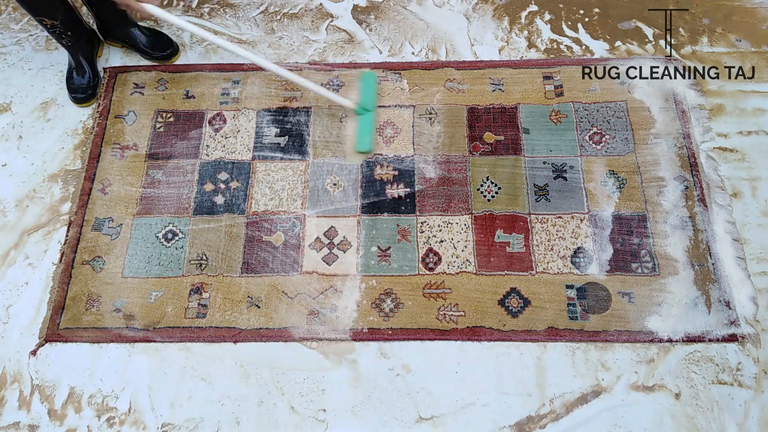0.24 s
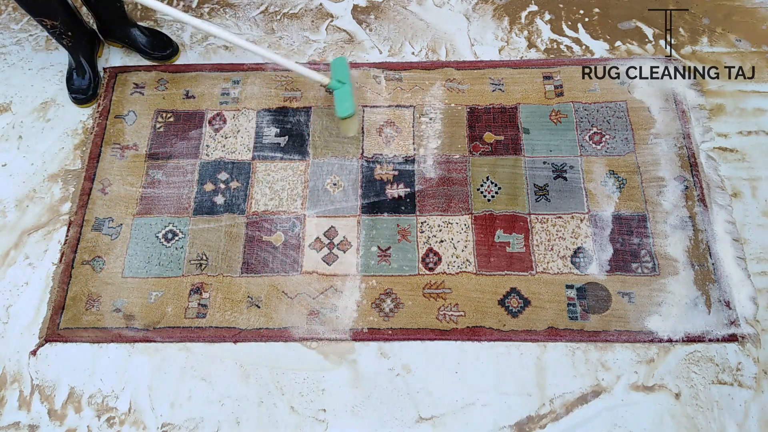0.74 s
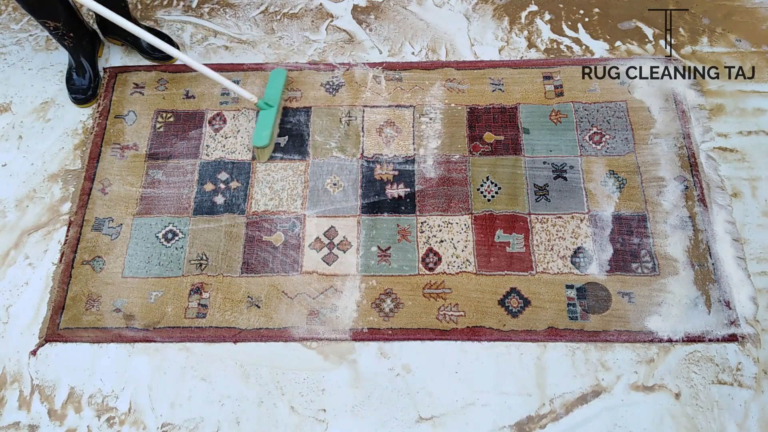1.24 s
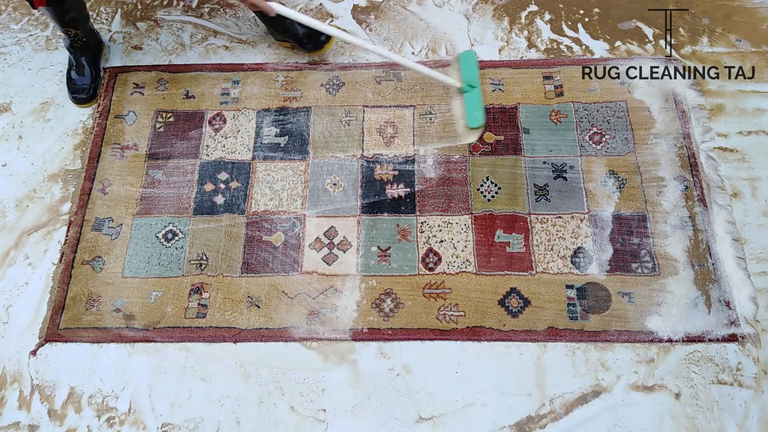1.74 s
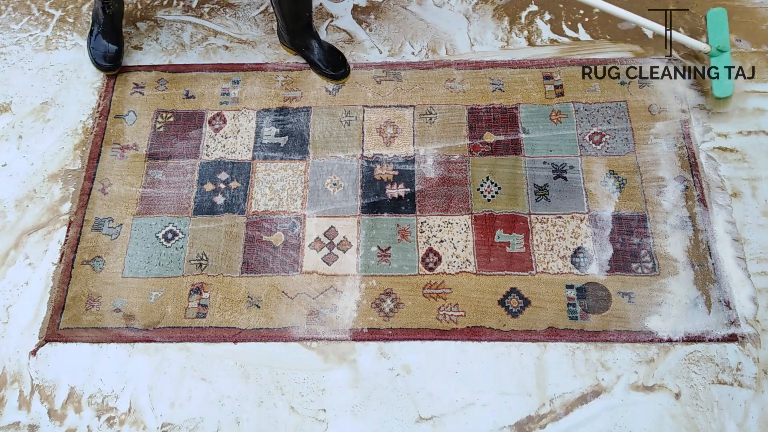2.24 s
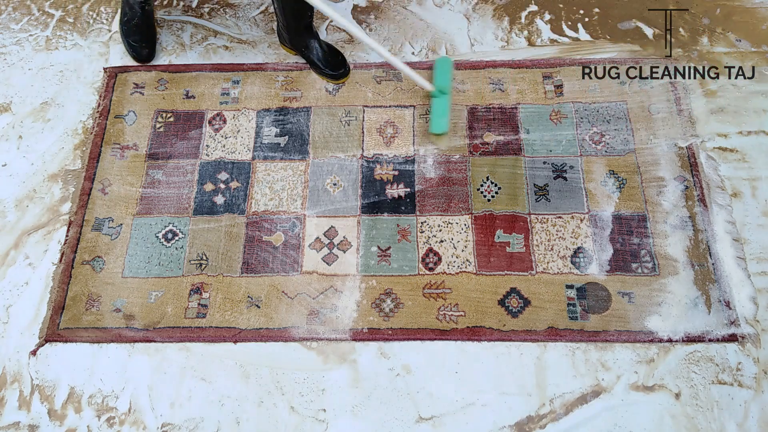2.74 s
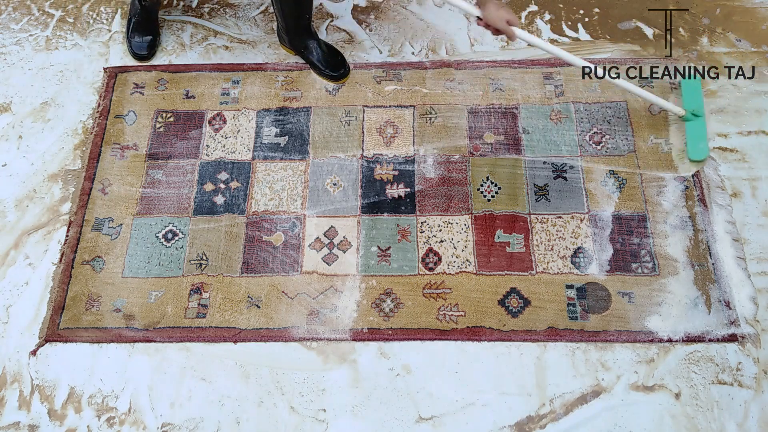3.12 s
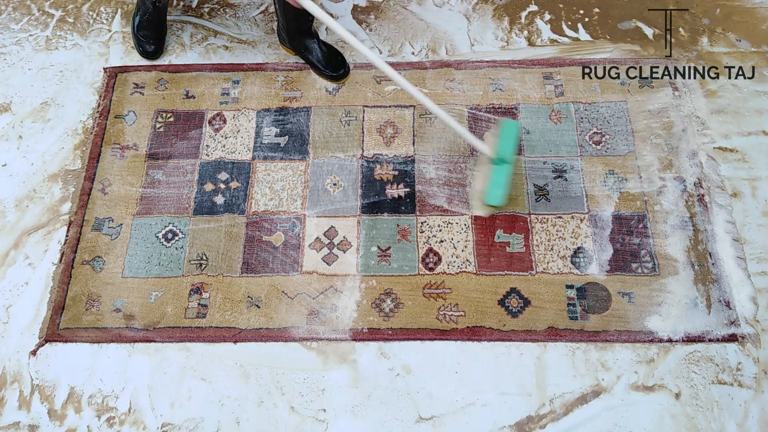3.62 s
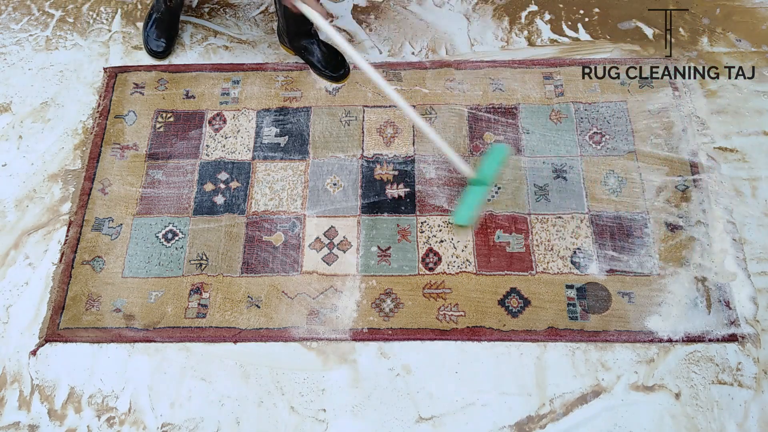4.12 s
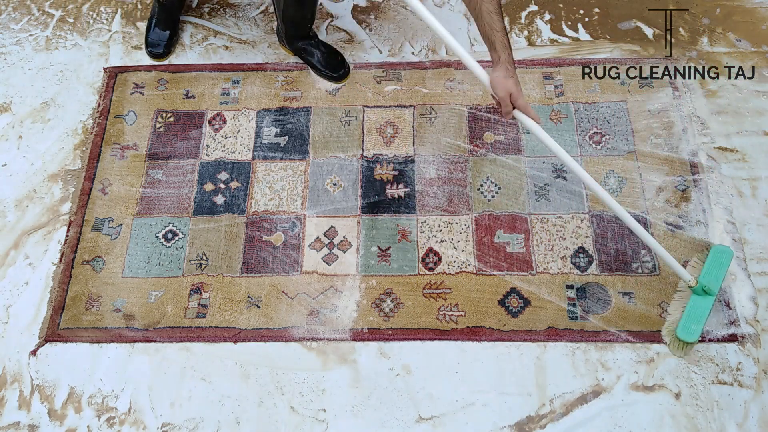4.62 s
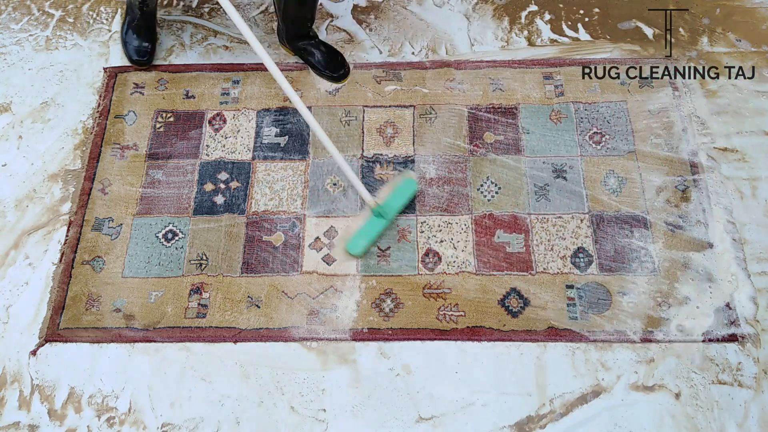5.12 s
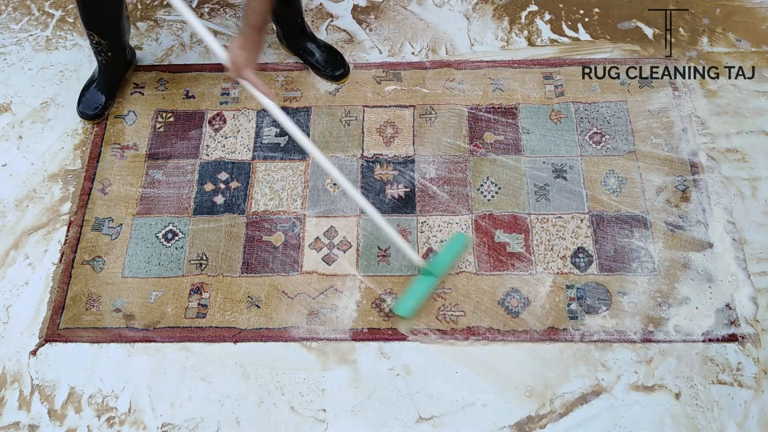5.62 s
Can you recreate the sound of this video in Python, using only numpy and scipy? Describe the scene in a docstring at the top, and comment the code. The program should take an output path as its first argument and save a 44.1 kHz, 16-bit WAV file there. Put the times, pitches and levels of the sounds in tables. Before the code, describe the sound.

Stiff bristles rasp back and forth over a foamy wet rug, the brush head smacking down once early on.

```python
"""A stiff push brush scrubs a wet, soapy rug on a hard floor in a washing room. It opens on quick
strokes over dull bumps: bristle tips flick across the pile, rasping lower the harder they bend, while
foam fizzes and wet tufts groan. A faint tone starts to come and go. Near 0.9 s the head is slapped
down; a light touch leads into one long, softer stroke. Set down again, the brush scrubs briskly back
and forth from 2.5 s to the end."""
import sys
import numpy as np
from scipy import signal
from scipy.fft import rfft, irfft
from scipy.io import wavfile

SR = 44100
rng = np.random.default_rng(int(sys.argv[2]) if len(sys.argv) > 2 else 0)


def unload_audio(sound):
    """Save the sound as a 16-bit wav file, at the path given as the first command line argument."""
    columns = np.transpose(np.atleast_2d(sound))
    # keep every value between -1 and 1, then stretch to whole-number steps
    steps = np.round(np.clip(columns, -1, 1) * 32767)
    wavfile.write(sys.argv[1], SR, steps.astype(np.int16))


N = 258426
TIME = np.arange(N) / SR
FREQS = np.maximum(np.arange(N + 1) * SR / (2 * N), 1)


def from_db(db):
    """Decibels to gain."""
    return 10 ** (np.asarray(db) / 20)


def to_db(power):
    """Power to decibels."""
    return 10 * np.log10(power + 1e-14)


def rms_one(x):
    """Scale to unit power."""
    return x / np.sqrt(np.mean(x ** 2) + 1e-20)


def at_hz(points, hz):
    """Read a curve on a log-frequency axis."""
    points = np.array(points)
    return np.interp(np.log(hz), np.log(points[:, 0]), points[:, 1])


def shaped(x, gain):
    """Equalise with a gain given at FREQS."""
    return irfft(rfft(x, 2 * N) * gain)[:N]


def coloured(x, spectrum):
    """Give x a tone colour, at unit power."""
    return rms_one(shaped(x, from_db(at_hz(spectrum, FREQS))))


def band(x, low_hz, high_hz, order=2):
    """Causal band-pass."""
    sos = signal.butter(order, [low_hz, min(high_hz, .45 * SR)], "band", fs=SR, output="sos")
    return signal.sosfilt(sos, x + 1e-18)


def drift(per_s):
    """A random wander at unit power, with about per_s turns a second."""
    knots = rng.standard_normal(4000)
    return rms_one(np.interp(TIME * per_s, np.arange(len(knots)), knots))


def flicks(per_s):
    """Random clicks of uneven size, at unit power."""
    return rms_one(rng.standard_normal(N) * (rng.random(N) < per_s / SR))


def ease(x):
    """Smooth fade from 0 to 1 as x goes from 0 to 1."""
    return np.sin(np.pi / 2 * np.clip(x, 0, 1)) ** 2


def burst(start, rise, t60):
    """Envelope of a hit: quick attack, exponential decay."""
    age = np.maximum(TIME - start, 0)
    return (1 - np.exp(-age / rise)) * from_db(-60 * age / t60)


def brush_motion():
    """Each stroke speeds up and slows, bending the bristles; the loudest contact sets the colour."""
    # Pushes and pulls. Each row: start in seconds, length in seconds, rasp level in dB, bite (share of
    # full speed reached almost at once), attack, release and bending time in seconds, low edge of the
    # bent rasp in Hz, then rubbing and foam in dB relative to the rasp.
    strokes = [ (-0.195, 0.29, -34, 0.1, 0.09, 0.18, 0.035, 430, -7.5, -1),
               (0.051, 0.38, -35.5, 0.31, 0.24, 0.21, 0.032, 360, -11, -6),
               (0.463, 0.22, -37, 0, 0.084, 0.16, 0.004, 340, -32, -3.5),
               (1.381, 0.78, -40.5, 0.01, 0.13, 0.13, 0.22, 344, -19, -4.5),
               (2.489, 0.35, -35, 0.06, 0.19, 0.12, 0.043, 382, -11, -6.5),
               (2.858, 0.33, -35, 0.07, 0.11, 0.2, 0.039, 466, -15.5, -5.5),
               (3.178, 0.36, -33, 0.02, 0.22, 0.14, 0.051, 423, -17, -5.5),
               (3.547, 0.37, -36, 0.22, 0.12, 0.2, 0.015, 607, -20, -4.5),
               (3.992, 0.28, -33, 0.55, 0.18, 0.13, 0.019, 312, -13, -4),
               (4.282, 0.37, -34, 0.2, 0.17, 0.2, 0.058, 455, -12.5, -5),
               (4.74, 0.32, -33.5, 0.42, 0.1, 0.15, 0.022, 406, -14.5, -3),
               (5.047, 0.388, -35, 0.06, 0.19, 0.19, 0.063, 525, -42, -2.5),
               (5.408, 0.15, -60, 0.2, 0.12, 0.041, 0.01, 1600, -28, 10),
               (5.518, 0.38, -35, 0.38, 0.1, 0.14, 0.036, 437, -14.5, -1.3)]
    # The head drags lightly as it turns round. Each row: start and end in seconds, rasp level in dB.
    on_rug = [(-0.1, 0.687, -56), (2.432, 4.687, -60), (4.641, 4.8, -65), (4.76, 5.486, -58.5)]
    settle_s, bite_s = 0.068, 0.023
    drag_hz, straight_hz = 1000, 3500  # low edge of the rasp: light drag, unbent bristles
    firm_db, thinning = -35.5, 0.61  # strokes below firm lose body, in dB for each dB
    drag = sum(from_db(db) ** 2 * ease((TIME - down) / settle_s) * ease((up - TIME) / settle_s)
               for down, up, db in on_rug)
    rasp = drag + 1e-14
    fizz = drag * from_db(-3) ** 2
    rub, log_edge, body = 0, rasp * np.log(drag_hz), 0
    for start, length, db, bite, attack, release, bend_s, bent_hz, rub_db, fizz_db in strokes:
        age = np.maximum(TIME - start, 1 / SR)
        rising = bite * ease((TIME - start) / bite_s) + (1 - bite) * ease((TIME - start) / attack)
        speed = rising * ease((length - age) / release) ** 0.6  # stops short
        edge_hz = np.minimum(bent_hz * (1 + (bend_s / age) ** 1.84), straight_hz)
        lather_db = 2 * (np.minimum(age / length, 1) - .5)  # foam piles up over the stroke
        power = (from_db(db) * speed) ** 2
        rasp += power
        rub += power * from_db(rub_db) ** 2
        fizz += (from_db(db + fizz_db + lather_db) * speed ** 0.88) ** 2  # follows speed more loosely
        log_edge += power * np.log(edge_hz)
        body += power * thinning * min(db - firm_db, 0)
    return to_db(rasp), to_db(rub), to_db(fizz), np.exp(log_edge / rasp), body / rasp


def bristles(level_db, edge_hz, body_db):
    """Tips flick free of the pile, tuft by tuft; bent bristles let the lower bands speak."""
    # Colour of the rasp. Each row: frequency in Hz, level in dB.
    rasp_colour = [(200, -1), (450, -8.5), (700, -2), (950, -0.5), (1250, -1.5), (1900, 1.63), (2750, -3.5),
                   (3700, -2), (4700, -8), (5600, -6), (7000, -17.5), (14000, -37)]
    body_hz, patchy_db, judder_db = 1070, 1.5, 0.35
    sources = [coloured(flicks(per_s=8000), rasp_colour) for _ in range(2)]
    edges = np.geomspace(200, 15000, 25)
    out = 0
    for k, (low, high) in enumerate(zip(edges, edges[1:])):
        hz = np.sqrt(low * high)
        low_shelf_db = body_db / (1 + (hz / body_hz) ** 4)
        tufts = band(sources[k % 2], low, high, order=4) * from_db(patchy_db * drift(45) + low_shelf_db)
        out += tufts / np.sqrt(1 + (edge_hz / hz) ** 10.5)  # steep, moving low cut
    # the whole head judders a little as it drags
    return rms_one(out) * from_db(level_db + judder_db * drift(82))


def resonate(x, hz, t60):
    """A click sets a sine ringing; nothing passes far below its pitch."""
    decay, step = from_db(-60 / (t60 * SR)), 2 * np.pi * hz / SR
    ring = signal.lfilter([0, np.sin(step)], [1, -2 * decay * np.cos(step), decay * decay], x + 1e-18)
    return signal.sosfilt(signal.butter(4, .75 * hz, "high", fs=SR, output="sos"), ring)


def rubbing(level_db, edge_hz):
    """Wet tufts stick and slip, ringing briefly just above the low edge of the rasp."""
    centre_hz, width_octaves, slips_per_s, t60 = 1.49 * edge_hz, 0.45, 14, .11
    out, power = 0, 1
    for hz in np.geomspace(260, 1900, 30):
        share = np.exp(-(np.log2(hz / centre_hz) / width_octaves) ** 2)
        slips = np.sign(flicks(slips_per_s)) * share
        out += resonate(slips, hz, t60)
        power += share ** 2
    slip_power = slips_per_s * t60 / (4 * np.log(1000))  # each slip is one decaying sine
    return from_db(level_db) * out / np.sqrt(power * slip_power)


def foam(level_db):
    """Tiny bubbles burst under the bristles."""
    # Colour of the fizz. Each row: frequency in Hz, level in dB.
    fizz_colour = [(2500, -19), (4000, 2), (4800, 2.5), (5600, 3), (7000, -4.5), (9200, -6.5), (10300, -2),
                   (12000, -4), (14000, 0), (16000, -5.5)]
    return from_db(level_db) * coloured(flicks(per_s=18000), fizz_colour)


def room_air():
    """Still air lays a low, quiet bed under the scene."""
    # Colour of the air. Each row: frequency in Hz, level in dB.
    air_colour = [(25, -21.5), (50, -4), (90, 2), (150, 0), (330, -4.5), (600, -11), (1000, -12.5),
                  (2000, -21), (4000, -26), (8000, -30.5), (14000, -26)]
    return from_db(-71) * coloured(rng.standard_normal(N), air_colour)


def contacts(rows, width_ratio, rise):
    """Each contact is a short noise burst in a band around its own pitch."""
    out, age = np.zeros(N + SR), TIME[:SR // 2]
    for start, db, hz, t60, *_ in rows:
        at = round(start * SR)
        noise = rms_one(band(rng.standard_normal(len(age)), hz / width_ratio, hz * width_ratio))
        out[at:at + len(age)] += noise * (1 - np.exp(-age / rise)) * from_db(db - 60 * age / t60)
    return out[:N]


def thuds():
    """Dull, soft-edged bumps on the floor."""
    # Each row: start in seconds, level in dB, centre in Hz, 60 dB decay time in seconds.
    bumps = [(0.005, -45.5, 294, 0.32), (0.072, -44.5, 280, 0.29), (0.105, -55.5, 96, 0.39),
             (0.575, -59, 290, 0.37), (1.2, -62, 380, 0.18), (3.215, -49.5, 84.5, .45),
             (4.13, -49.5, 88, 0.48), (4.145, -51, 216, 0.24), (4.195, -59, 72, 0.19)]
    return contacts(bumps, width_ratio=1.25, rise=0.0051)


def groans():
    """Tufts catch together in short rubbery groans, each on a wavering, sinking pitch."""
    # Each row: peak time in seconds, level in dB, pitch in Hz, half-length in seconds.
    catches = [(0.264, -49, 474, 0.027), (1.95, -47.5, 459, 0.069), (2.57, -37.5, 485, 0.011),
               (2.602, -35, 656, 0.027), (2.688, -37, 890, 0.11), (2.973, -40, 818, 0.013),
               (3.032, -40, 545, 0.019), (3.305, -37, 679, 0.03), (4.37, -43.5, 714, 0.019),
               (4.782, -38, 744, 0.025), (4.96, -40, 458, 0.046)]
    waver, fall_per_s = 0.0492, 0.65  # as shares of the pitch
    wavering_time = np.cumsum(1 + waver * drift(220)) / SR
    out = np.zeros(N)
    for peak, db, hz, half_length in catches:
        near = np.abs(TIME - peak) < 2 * half_length
        offset = TIME[near] - peak
        phase = 2 * np.pi * hz * (wavering_time[near] - fall_per_s * offset ** 2 / 2)
        out[near] += from_db(db) * np.exp(-2 * (offset / half_length) ** 2) * np.sin(phase)
    return out


def head_ring(start, db_per_octave, rise):
    """Head and handle ring, a little differently at each blow; the tilt favours the upper modes."""
    # Each row: pitch in Hz, relative level in dB, 60 dB decay time in seconds.
    modes = [(177, -8.5, .25), (264, -10.5, 0.17), (338, -9.5, .19), (368, -9.5, 0.13), (431, -9, 0.13),
             (502, -4.5, 0.14), (554, -9, 0.18), (649, -4.5, 0.13), (923, -11, 0.12), (1019, -3, 0.08),
             (1302, -5, 0.093), (1770, -11.5, 0.076), (2070, -16.5, 0.099), (3140, -27, 0.15),
             (3540, -25, .2), (3900, -26.5, 0.22)]
    age = np.maximum(TIME - start, 0)[:round((start + .5) * SR)]
    out = np.zeros(N)
    for k, (hz, db, t60) in enumerate(modes):
        struck_db = db + db_per_octave * np.log2(hz / 1000) + rng.normal(0, 1.5)
        envelope = from_db(struck_db - 60 * age / t60) * (1 - np.exp(-age / rise))
        out[:len(age)] += (-1) ** k * envelope * np.sin(2 * np.pi * hz * age)
    return out


def taps():
    """Bristles rustle and cushion the head, which rings softly as it is set down."""
    # Each row: start in seconds, rustle level in dB, its centre in Hz, its 60 dB decay time in seconds,
    # gain of the head's ring in dB.
    touches = [(0.436, -43, 2490, .08, -50.5), (1.268, -56, 5660, 0.41, -50), (1.301, -65, 3500, 0.14, -54),
               (2.379, -46.5, 3900, 0.18, -53.5), (2.413, -43, 2100, 0.1, -52.5),
               (4.002, -48, 2500, .1, -52), (4.063, -28.5, 5960, 0.11, -39),
               (4.751, -34.5, 2130, 0.072, -53)]
    ring = sum(from_db(ring_db) * head_ring(start, db_per_octave=6, rise=0.011)
               for start, *_, ring_db in touches)
    return contacts(touches, width_ratio=1.58, rise=0.0028) + ring


def faint_tone():
    """A narrow, fluttering whistle swells now and then in the background."""
    # Each row: peak time in seconds, level in dB, half-length in seconds.
    swells = [(0.715, -65.5, 0.089), (1.253, -69, 0.036), (1.468, -55, 0.052), (2.25, -69, 0.1)]
    pitch_hz, flutter_hz = 1268, 45
    envelope = sum(from_db(db) * np.exp(-2 * ((TIME - peak) / half_length) ** 2)
                   for peak, db, half_length in swells)
    return envelope * rms_one(band(rng.standard_normal(N), pitch_hz - flutter_hz, pitch_hz + flutter_hz))


def slap():
    """Wet bristles land first and buckle; then the block smacks the floor, rattles and rings."""
    # Two moments in seconds: the bristles touch, the block lands.
    landing = (0.877, 0.9055)
    # Colour of the landing bristles. Each row: frequency in Hz, level in dB.
    splat_colour = [(120, -42.5), (200, -21.5), (380, -8.5), (1230, 1.5), (2300, -7.5), (4100, -2),
                    (6400, -8.5), (8100, -15.5), (10300, -13), (14000, -8.5)]
    # Colour of the block's smack. Each row: frequency in Hz, level in dB.
    smack_colour = [(40, -60.5), (85, -28.5), (165, -7), (260, -7.5), (420, -3), (700, -7), (950, -8.5),
                    (1250, -8), (2100, -10.5), (2650, -24), (3700, -13), (6000, -20.5), (8200, -30),
                    (13000, -25.5), (15000, -32)]
    touch, land = landing
    splat = coloured(flicks(per_s=28000), splat_colour) * burst(touch, rise=0.006, t60=0.28)
    # a minimum-phase pulse carries the smack's colour and keeps its attack sharp
    cepstrum = irfft(np.log(from_db(at_hz(smack_colour, FREQS))))[:N] * np.where(TIME > 0, 2, 1)
    pulse = irfft(np.exp(rfft(cepstrum, 2 * N)))[:N // 50]
    pulse /= np.abs(pulse).max()
    click = (np.arange(N) == round(land * SR)) * 1.0
    snap = burst(land, rise=0.00024, t60=0.028)
    settle = from_db(-6) * burst(land, rise=0.0025, t60=0.17)
    rattle = flicks(per_s=9000) * (snap + settle)
    smack = signal.fftconvolve(from_db(-11.5) * click + from_db(-25.5) * rattle, pulse)[:N]
    ring = head_ring(land, db_per_octave=1.0, rise=0.0008)
    return from_db(-26.5) * splat - smack + from_db(-21.5) * ring


def room(x, wet_db, first_echo_s):
    """A diffuse tail from hard walls, dying sooner in the treble."""
    # Each row: frequency in Hz, 60 dB decay time in seconds.
    decay_times = [(100, 0.65), (300, 0.45), (1000, 0.38), (4000, .33), (8000, 0.3), (14000, 0.29)]
    age = TIME[:SR // 2]
    edges = np.geomspace(50, 16000, 9)
    tail = 0
    for low, high in zip(edges, edges[1:]):
        t60 = at_hz(decay_times, np.sqrt(low * high))
        tail += band(rng.standard_normal(len(age)), low, high) * from_db(-60 * age / t60)
    tail *= age > first_echo_s
    return x + from_db(wet_db) * signal.fftconvolve(x, tail / np.sqrt(np.sum(tail ** 2)))[:N]


def scene():
    """Brush, bumps and room, heard from one point."""
    rasp_db, rub_db, fizz_db, edge_hz, body_db = brush_motion()
    rasp = bristles(rasp_db - 0.6, edge_hz, body_db)
    scrub = rasp + rubbing(rub_db, edge_hz) + foam(fizz_db) + groans()
    knocks = slap() + taps() + thuds()
    air = room_air()
    mono = room(scrub + knocks, wet_db=-14.5, first_echo_s=0.0044) + faint_tone() + air
    return np.array([mono, mono])


def record(dry):
    """The microphone port cancels one narrow treble band; the top is cut."""
    notch_hz, cutoff_hz = 8270, 14330
    notch = signal.iirnotch(notch_hz, Q=8.0, fs=SR)
    high_cut = 1 / np.sqrt(1 + (FREQS / cutoff_hz) ** 400)
    return np.array([shaped(signal.lfilter(*notch, side), high_cut) for side in dry])


dry = scene()
out = record(dry)
unload_audio(out)
```